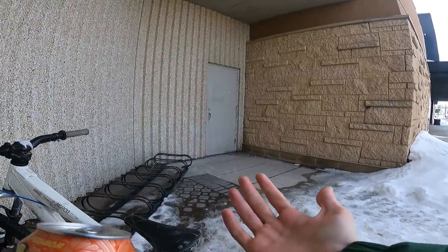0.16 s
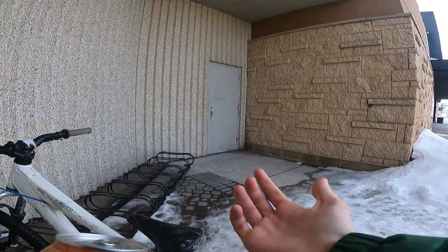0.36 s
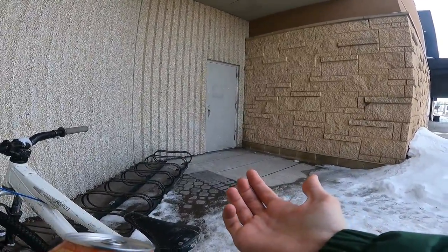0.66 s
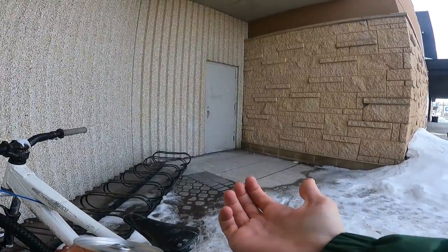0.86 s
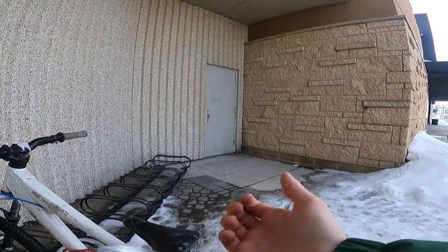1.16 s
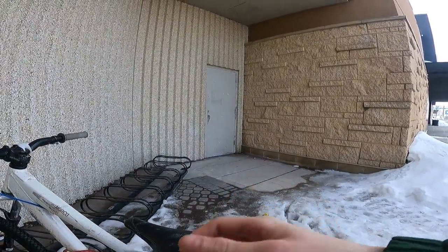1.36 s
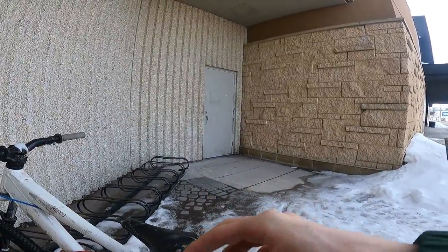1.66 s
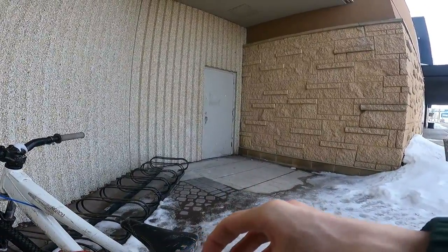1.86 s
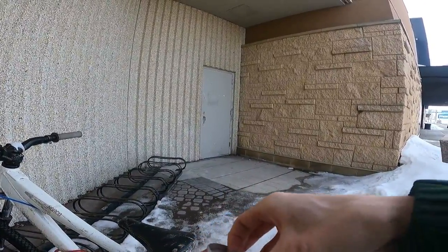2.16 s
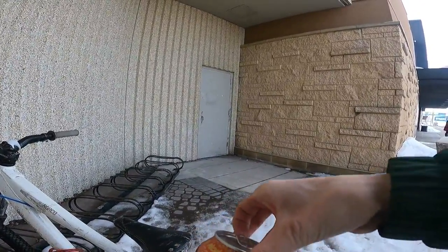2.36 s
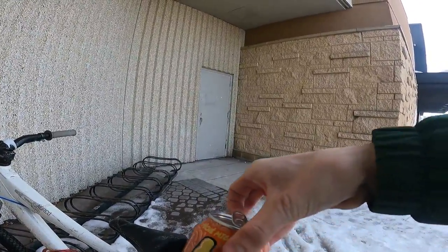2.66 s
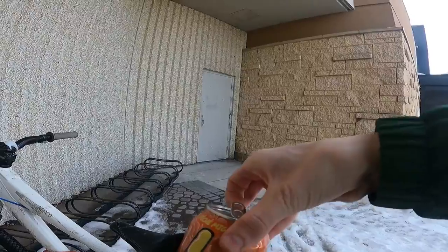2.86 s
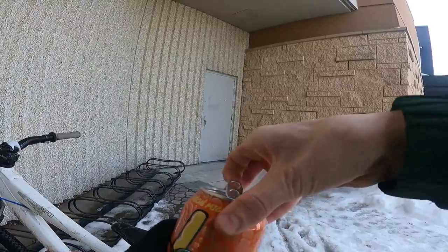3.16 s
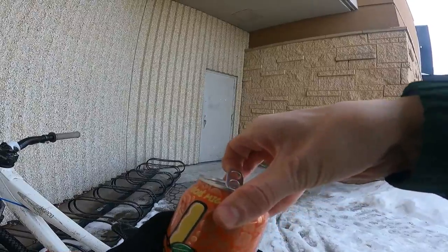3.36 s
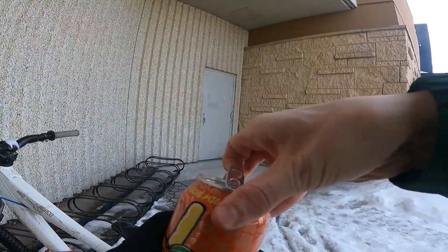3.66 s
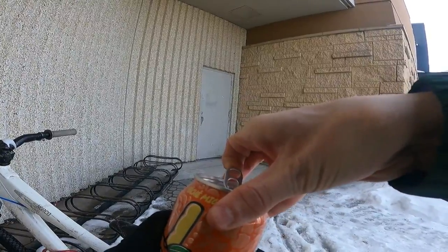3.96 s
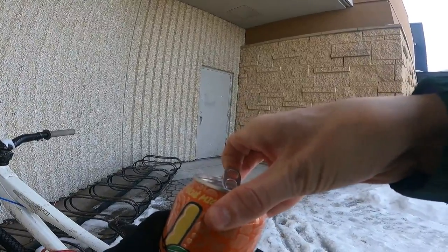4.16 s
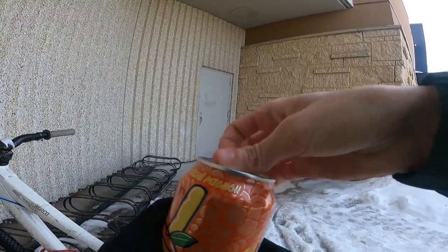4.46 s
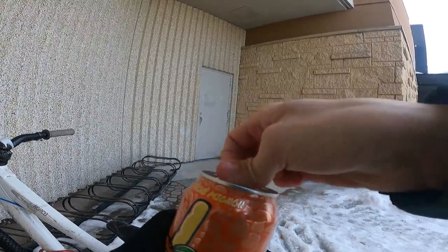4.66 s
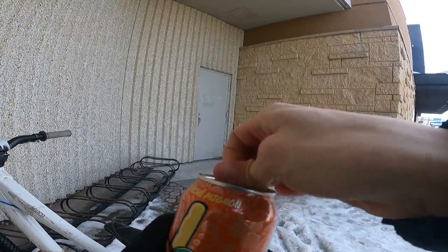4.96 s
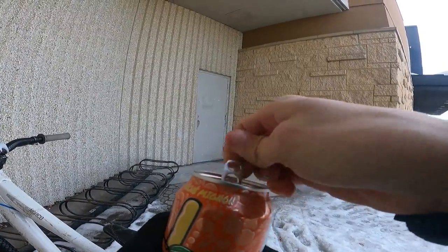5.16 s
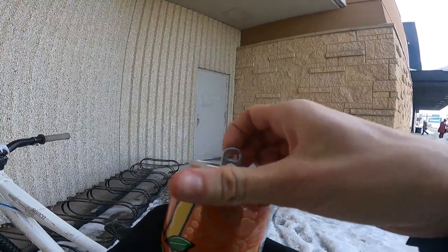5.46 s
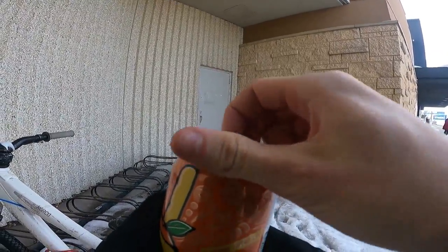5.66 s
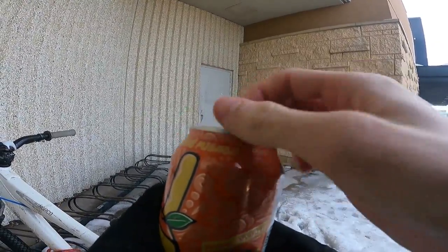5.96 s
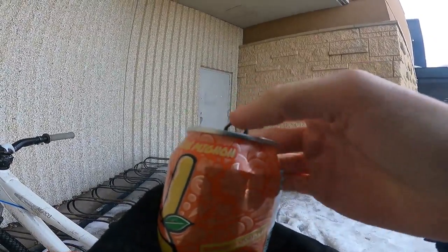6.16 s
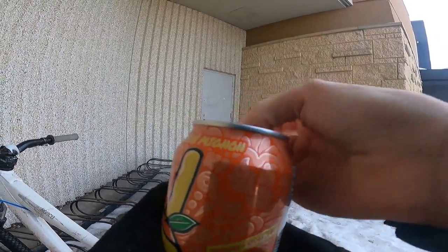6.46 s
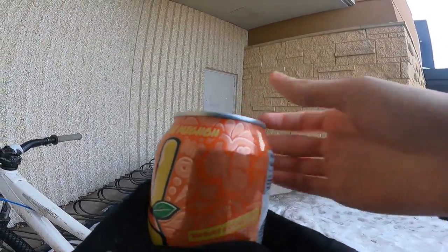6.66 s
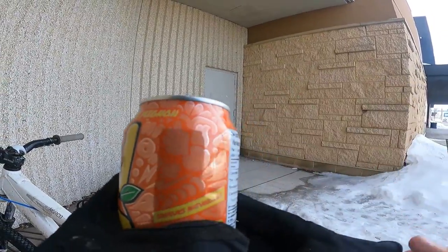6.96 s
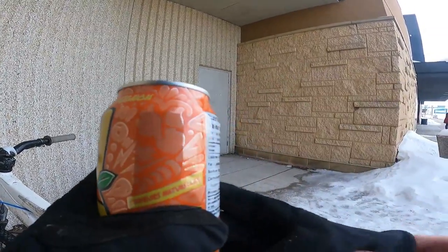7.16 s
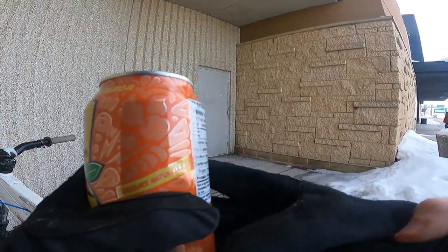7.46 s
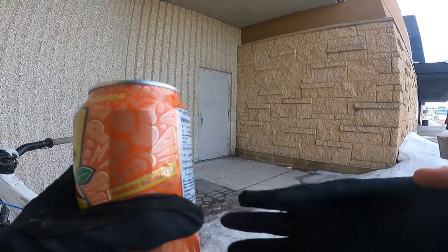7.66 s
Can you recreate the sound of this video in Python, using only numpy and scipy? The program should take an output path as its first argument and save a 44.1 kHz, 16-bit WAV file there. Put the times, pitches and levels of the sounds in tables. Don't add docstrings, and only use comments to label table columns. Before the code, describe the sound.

Outdoors over a low traffic and engine hum, nails tick on a can tab, the seal snaps and hisses, then the lid pops open with brief fizz.

```python
import sys
import numpy as np
from scipy import signal
from scipy.fft import rfft, irfft, next_fast_len
from scipy.io import wavfile

SR = 44100
rng = np.random.default_rng(int(sys.argv[2]) if len(sys.argv) > 2 else 0)


def how_loud(loudness_db):
    steps = np.asarray(loudness_db, float) / 20
    return 10 ** steps


def transcribe(signal):
    frames = np.atleast_2d(signal).T
    limited = np.clip(frames, -1, 1)
    pcm = np.round(limited * 32767).astype(np.int16)
    wavfile.write(sys.argv[1], SR, pcm)


N = 343980


def rms_one(x):
    return x / np.sqrt(np.mean(x ** 2) + 1e-20)


def in_time(rows):
    s, *columns = np.transpose(rows)
    return [np.interp(np.arange(N) / SR, s, c) for c in columns]


def at_hz(points, hz):
    table_hz, values = np.array(points).T
    return np.interp(np.log(hz), np.log(table_hz), values)


def drift(rate_hz):
    r = np.exp(-80 * np.pi * rate_hz / SR)
    noise = rng.standard_normal(N // 40 + 2002)
    slow = signal.lfilter([1], [1, -2 * r, r * r], noise)[2000:]
    return np.interp(np.arange(N) / 40, np.arange(len(slow)), rms_one(slow))


def band(x, low_hz, high_hz):
    return signal.sosfilt(signal.butter(2, [low_hz, high_hz], "band", fs=SR, output="sos"), x)


def coloured(x, spectrum):
    size = next_fast_len(N)
    hz = np.maximum(np.arange(size // 2 + 1) * SR / size, 1)
    return rms_one(irfft(rfft(x, size) * how_loud(at_hz(spectrum, hz)), size)[..., :N])


def resonate(x, peaks):
    out = 0
    for k, (hz, width, db) in enumerate(peaks):
        r = np.exp(-np.pi * max(width, 5) / SR)
        poles = [1, -2 * r * np.cos(2 * np.pi * hz / SR), r * r]
        out = out + (-1) ** k * how_loud(db) * signal.lfilter([1 - r, 0, r - 1], poles, x)
    return out


def resonate_twice(x, hz, width):
    peak = [(hz, 1.9 * width, 0)]
    return resonate(resonate(x, peak), peak)


def add(track, s, sound):
    i = round(s * SR)
    track[..., i:i + sound.shape[-1]] += sound[..., :N - i]


def swell(s, db, hold_s, rise_s, fall_s):
    t = np.arange(N) / SR - s
    steps = np.maximum(-t / max(rise_s, .001), (t - hold_s) / max(fall_s, .001))
    return db - np.clip(20 * steps, 0, 120)


def swing(delay_ms, width_ms, low_cut_hz):
    t = np.arange(3000) / SR * 1000
    dip = -np.exp(-((t - delay_ms) / width_ms) ** 2)
    return signal.lfilter(*signal.butter(1, low_cut_hz, "high", fs=SR), dip)


def blow(peaks, contact_ms, crack_db, damp_ms=11.0, rough=1.0, uneven_db=0.0):
    t = np.arange(4096) / SR * 1000
    push = t / contact_ms * np.exp(-t / contact_ms)
    contact = (1 + rough * rng.standard_normal(len(t))) * push + 1e-12
    click = 1.0 * (t == 0)
    ring = 0
    for (hz, width, db), luck in zip(peaks, rng.standard_normal(len(peaks))):
        share = np.std(resonate_twice(click, hz, width)) * how_loud(db + uneven_db * luck)
        ring = ring + rms_one(resonate_twice(contact, hz, width)) * share
    ring = ring * np.exp(-t / damp_ms)
    crack = band(contact, 900, 7000)
    sound = ring / np.abs(ring).max() + how_loud(crack_db) * crack / np.abs(crack).max()
    sound = signal.sosfilt(signal.butter(2, 13000, fs=SR, output="sos"), sound)
    return sound / np.abs(sound).max()


def struck(events, peaks, contact_ms, crack_db, damp_ms, uneven_db=0.0, rough=12.0):
    out = np.zeros(N)
    for s, db in events:
        add(out, s, how_loud(db) * blow(peaks, contact_ms, crack_db, damp_ms, rough, uneven_db))
    return out


def grains(per_s, spread_db):
    sizes = how_loud(spread_db * np.minimum(rng.exponential(1, N), 4)) * rng.choice([-1, 1], N)
    return sizes * (rng.random(N) < per_s / SR) + 1e-12


def spread(x, wide, pan_db):
    padded = np.pad(x, 4096, "reflect")
    side = wide * signal.hilbert(padded, next_fast_len(N + 8192)).imag[4096:N + 4096]
    return x * how_loud([[pan_db / 2], [-pan_db / 2]]) + side * [[1], [-1]]


def squeal_tone(s, hz, db, rise_s, fall_s, second_db, third_db):
    t = np.arange(N) / SR - s
    pitch = hz - 50 * np.maximum(t, 0)
    turn = 2 * np.pi * np.cumsum(pitch * (1 + .0012 * drift(40))) / SR
    tone = np.sin(turn) + how_loud(second_db) * np.sin(2 * turn) + how_loud(third_db) * np.sin(3 * turn)
    level_db = swell(s, db, .85 * fall_s, rise_s, fall_s) + 2.2 * drift(25)
    return np.sqrt(2) * how_loud(level_db) * tone


# t/s, level/dB
DUCKS = [
    (3.05, 1.5),
    (3.87, 1.5),
    (5.0, 7),
]


def ducking():
    out = 0
    for s, db in DUCKS:
        after = np.maximum(np.arange(N) / SR - s, 0)
        out = out - 2 * db * (1 - np.exp(-after / .15)) * np.exp(-after / .7)
    return out


# t/s, level/dB, width/s
GUST = (7.34, 3.5, .4)


def gust():
    s, db, width_s = GUST
    return db * np.exp(-((np.arange(N) / SR - s) / width_s) ** 2)


# t/s, level/dB
AIR_HISS = [(0, -70), (.56, -75.5), (1.21, -75.5), (1.45, -67), (1.61, -74), (2.06, -65), (2.45, -60),
            (3.41, -75.5), (3.82, -67), (4.15, -82), (4.45, -74), (4.97, -72), (5.42, -88), (5.72, -71),
            (5.93, -66.5), (6.03, -82), (6.5, -71.5), (7.8, -73)]
# f/Hz, level/dB per Hz
AIR_TONE = [(11, -30), (18, 4.5), (38, -2), (128, -13), (165, -11.5), (275, -22), (317, -20), (410, -21),
            (446, -27.5), (500, -23), (703, -41), (961, -34), (6820, -53), (9500, -63), (12200, -66),
            (16000, -93)]
# f/Hz, likeness (0 to 1)
LIKENESS = [(60, 1.0), (180, 1), (550, 1), (1650, 0.79), (4970, 0.84), (15000, 0.45)]
# f/Hz, share (0 to 1)
AIR_FOLLOWS = [(40, .1), (350, .12), (1700, .55), (8000, .95)]


def town_air():
    hiss_db = in_time(AIR_HISS)[0]
    hiss_db = hiss_db - np.median(hiss_db)
    edges = 16 * 2 ** np.arange(0, 10.1, .5)
    white = rng.standard_normal((2, 2, N))
    out = 0
    for k, (low, high) in enumerate(zip(edges, edges[1:])):
        mid, side = band(white[k % 2], low, high)
        hz = np.sqrt(low * high)
        share = at_hz(AIR_FOLLOWS, hz)
        alike = np.clip(at_hz(LIKENESS, hz) ** 2.7, 0, 1)
        level_db = at_hz(AIR_TONE, hz) + share * hiss_db + 1.3 * drift(17)
        level_db = level_db + (1 - share) * ducking() * (1 if hz < 120 else .6) + gust() * (hz < 120)
        stereo = np.sqrt(1 + alike) * mid + np.sqrt(1 - alike) * side * [[1], [-1]]
        out = out + how_loud(level_db) * stereo
    return how_loud(-36) * rms_one(out) * how_loud([[-.3], [.3]])


# t/s, level/dB
HUM = [(0, -48), (.32, -42), (.6, -39.5), (1.15, -51), (1.65, -35), (2.65, -41.5), (3.34, -47.5),
       (3.71, -43.5), (4.13, -55), (4.7, -47), (5.24, -56), (7.2, -55), (7.8, -47)]
# f/Hz, level/dB under the drone
FANS = [(240, -9.5), (323, -11), (355, -10.5), (405, -9.5)]
# t/s, f/Hz
FIRING = [(0, 80.67), (3.6, 79.63), (4.6, 77.18), (7.8, 76.64)]


def engine():
    second_db = in_time(HUM)[0] - 0.9 + 0.91 * drift(4.6)
    first_db = -46 + 3.5 * drift(1.2) + ducking() - 4.5 + 0.78 * drift(5.5)
    turn = 2 * np.pi * np.cumsum(in_time(FIRING)[0] * (1 + .003 * drift(4))) / SR
    out = how_loud(second_db) * np.sin(2 * turn) + how_loud(first_db) * np.sin(turn)
    for hz, db in FANS:
        fan_db = -48.5 + .6 * ducking() + db + 2.4 * drift(5.9)
        out += how_loud(fan_db) * np.sin(2 * np.pi * hz * np.arange(N) / SR + 1.67 * drift(2.8))
    boom = [(33, 18, 0)]
    throb = resonate(resonate(rng.standard_normal(N), boom), boom)
    return np.sqrt(2) * out + how_loud(-40 + ducking() + gust() - 6) * rms_one(throb)


# t/s, level/dB, brightness/dB, rise/s, fall/s
RUSTLE = [
    (.03, -48, -3, .1, .09),
    (1.4, -59, -5, .3, .2),
    (4.242, -49.5, 0, .028, .06),
    (6.415, -57, 1, .03, .03),
    (7.434, -49, -7, .015, .1),
    (7.6, -49, -1, .045, .03),
    (7.68, -64, -3, .3, .3),
]


def rustle():
    strokes = [how_loud(swell(s, db, .3 * fall_s, rise_s, fall_s)) for s, db, _, rise_s, fall_s in RUSTLE]
    dull = sum(strokes)
    bright = sum(x * how_loud(row[2]) for x, row in zip(strokes, RUSTLE))
    fibres = grains(9000, spread_db=3.0)
    body = resonate(fibres, [(980, 500, 1), (1700, 600, 4), (2500, 600, -2)])
    sheen = resonate(fibres, [(3700, 1400, 0), (7000, 2600, -14), (11300, 1900, -20)])
    rub = how_loud(16) * strokes[2] * rms_one(band(rng.standard_normal(N), 30, 180))
    rub += how_loud(-5) * strokes[2] * rms_one(resonate(fibres, [(4550, 70, 0)]))
    cloth = dull * rms_one(band(body, 500, 2800)) + bright * rms_one(band(sheen, 2700, 11000))
    return spread(cloth, .35, 0.074) + rub


# t/s, peak level/dB, ring f/Hz, left-right level/dB
TOUCHES = [(.063, -41, 5400, 2), (.173, -52, 6100, 3), (0.376, -46.5, 2700, 8), (0.39, -49, 6000, 1),
           (1.767, -37, 5100, 2), (1.772, -39, 1700, 2), (1.99, -45, 6500, 2), (1.993, -43, 2840, 4),
           (2.123, -49, 6000, 7), (2.228, -48, 5450, 9), (2.277, -35, 1900, 4), (4.44, -49.5, 7000, 0),
           (4.585, -46.5, 2500, 1), (5.035, -36, 4700, -2), (5.037, -35, 6950, 5), (5.41, -52, 2000, 0),
           (6.313, -55, 6500, 0), (7.43, -39, 1000, 2), (7.612, -38, 4200, 5)]


def touches():
    out = np.zeros((2, N))
    for s, db, hz, pan_db in TOUCHES:
        tap = blow([(hz, hz * 0.19, 0)], contact_ms=1.6, crack_db=-21.5, rough=5.0)
        add(out, s, how_loud(db) * tap * how_loud([[pan_db / 2], [-pan_db / 2]]))
    return out


# t/s, level/dB
GRABS = [(.445, -3), (.487, 3), (.55, -2), (.615, 4), (.658, 4), (.728, -1), (.82, 0), (.877, -1),
         (.94, -6), (.99, -9), (1.045, -9)]


def grabbing():
    t = np.arange(N) / SR
    return how_loud(-9) + sum(how_loud(db) * np.exp(-((t - s) / .02) ** 2) for s, db in GRABS)


# t/s, f/Hz, level/dB, rise/s, fall/s (per 20 dB)
SQUEAL = [
    (.45, 4785, -51.5, .06, .3),
    (.325, 4650, -55, .02, .17),
    (2.0, 5530, -65, .015, .2),
    (.77, 4700, -62, .05, .04),
    (.38, 4720, -62, .04, .06),
]


def brake_squeal():
    out = grabbing() * squeal_tone(*SQUEAL[0], -27, -49) + squeal_tone(*SQUEAL[1], -28, -40)
    return out + sum(squeal_tone(*row, -40, -50) for row in SQUEAL[2:])


# t/s, level/dB
BUMPS = [
    (.391, -24),
    (0.9955, -23.5),
    (3.6764, -10.5),
    (3.7621, -8),
    (7.735, -34),
]


def microphone_bumps():
    t = np.arange(3000) / SR * 1000
    edge = -np.cos(2 * np.pi * 0.33 * t) * np.exp(-t / 1.22) * (1 - np.exp(-(t / 0.15) ** 2))
    slow = swing(delay_ms=3.26, width_ms=1.57, low_cut_hz=18)
    knock = np.array([0.5 * edge + 0.23 * slow, 1.38 * edge + 1.8 * slow])
    out = np.zeros((2, N))
    for s, db in BUMPS:
        add(out, s, how_loud(db) * knock)
    return out


# t/s, peak level/dB
NAIL = [
    (2.3311, -39.5),
    (2.376, -25.5),
    (2.406, -26.5),
    (2.4169, -24),
    (2.4285, -26),
    (2.4492, -36),
]
# f/Hz, width/Hz, level/dB
NAIL_RING = [(2950, 200, -12), (4150, 600, 2), (7490, 310, -28)]


def nail_ticks():
    ticks = struck(NAIL, NAIL_RING, contact_ms=.06, crack_db=-24.5, damp_ms=3.0, rough=.4)
    return band(ticks, 2500, 5800)


# t/s, peak level/dB
SEAL = [
    (2.5518, -4),
]
# f/Hz, width/Hz, level/dB
SEAL_RING = [(2660, 200, -15), (3750, 450, -7), (4300, 600, 0), (5500, 130, -11), (6380, 300, -5),
             (7100, 200, -16), (8270, 300, -21), (9320, 200, -25), (10100, 250, -19), (12000, 500, -19)]


def seal_snap():
    return struck(SEAL, SEAL_RING, contact_ms=.07, crack_db=-22, damp_ms=2.5, rough=.2)


# t/s, level/dB, hold/s, rise/s, fall/s
VENT = (2.697, -24, .08, .018, .032)
VENT_SPURT = (2.705, -25, .004, .01, .015)
VENT_SIGH = (2.8, -62, .02, .05, .08)
# f/Hz, level/dB per Hz
VENT_TONE = [(290, -51.5), (500, -32.5), (545, -17.5), (1210, -12), (1930, -11), (2160, -15), (3540, -1.5),
             (5090, -4), (5880, 0.5), (8450, 0), (11100, -9), (12300, -7.5), (16000, -31)]


def gas_vent():
    flow = sum(how_loud(swell(*row)) for row in (VENT, VENT_SPURT, VENT_SIGH))
    return flow * coloured(grains(20000, spread_db=3.5), VENT_TONE)


# t/s, f/Hz, level/dB, rise/s, fall/s
SQUEAK = (3.037, 8020, -50, .011, .008)
# t/s, peak level/dB
RIVET = [
    (3.0443, -1),
]
# f/Hz, width/Hz, level/dB
RIVET_RING = [(1350, 200, -18), (1750, 330, -5), (3130, 120, -14), (3750, 420, 0), (4250, 520, -2),
              (5000, 250, -8), (6000, 250, -6), (6600, 150, -8), (7400, 180, -11), (8100, 170, -7),
              (8900, 200, -12), (10000, 300, -16)]


def rivet_crack():
    squeak = squeal_tone(*SQUEAK, -63.5, -60)
    return squeak + struck(RIVET, RIVET_RING, contact_ms=.1, crack_db=-20, damp_ms=4.0, rough=.2)


# t/s, peak level/dB
RATTLE = [
    (3.6706, -12),
    (3.7962, -15),
    (3.8005, -19),
    (3.8149, -10),
    (3.8676, -8),
    (3.8732, -13),
    (3.886, -24),
]
# f/Hz, width/Hz, level/dB
RATTLE_RING = [(600, 37, 0), (1920, 1100, -12.5), (3200, 250, -8), (4090, 340, -5), (5400, 400, -5.5),
               (5970, 150, 2.5), (7000, 300, -4), (8600, 600, -33), (9900, 460, -20), (12200, 320, -22)]


def tab_rattle():
    return struck(RATTLE, RATTLE_RING, contact_ms=.12, crack_db=-9, damp_ms=6.0, uneven_db=3.5, rough=2.5)


# t/s, peak level/dB
GRIP = [
    (4.2258, -30),
    (4.2417, -30),
    (4.244, -16.5),
    (4.262, -38),
    (4.2831, -41),
]
# f/Hz, width/Hz, level/dB
GRIP_RING = [(600, 150, -4), (2480, 430, 0), (4030, 280, -6), (4650, 220, -4), (5400, 300, -6),
             (7200, 420, -3), (8610, 290, -9), (9700, 240, -16), (11200, 290, -14), (12000, 300, -12)]


def grip_clicks():
    return struck(GRIP, GRIP_RING, contact_ms=.1, crack_db=-12, damp_ms=3.0, rough=.6, uneven_db=2.0)


# t/s, level/dB, hold/s, rise/s, fall/s
TEAR = (4.975, -25, .022, .016, .005)
TEAR_CREEP = (4.962, -52, .005, .03, .02)
# f/Hz, width/Hz, level/dB
TEAR_RING = [(703, 50, 6), (1180, 90, 0), (1810, 100, -10), (2480, 90, -12), (2770, 90, -11),
             (3200, 120, -2), (3605, 80, 6), (4450, 130, -5), (5025, 55, 8), (5700, 300, -16),
             (7150, 130, -8), (8390, 90, -10), (9200, 120, -14), (11000, 300, -22)]
# t/s, peak level/dB
POP = [
    (4.9838, -8),
    (4.9967, -1),
]
# f/Hz, width/Hz, level/dB
POP_RING = [(720, 160, 3), (1250, 200, -6), (2550, 200, -10), (3050, 150, -5), (3400, 220, 2),
            (4500, 250, -7), (5030, 130, -4), (5900, 300, -6), (7300, 350, -11), (8700, 400, -18)]


def lid_tear():
    slips = grains(9000, spread_db=2.5)
    rip = rms_one(resonate(slips, TEAR_RING)) + how_loud(-12) * rms_one(band(slips, 500, 5500))
    growth_db = 7 * np.clip((np.arange(N) / SR - TEAR[0]) / TEAR[2], 0, 1)
    out = (how_loud(swell(*TEAR) + growth_db) + how_loud(swell(*TEAR_CREEP))) * rip
    out += struck(POP, POP_RING, contact_ms=.08, crack_db=-10, damp_ms=9.0, rough=.5)
    add(out, POP[-1][0], how_loud(-10) * swing(delay_ms=3.4, width_ms=1.6, low_cut_hz=20))
    return out


# t/s, level/dB, hold/s, rise/s, fall/s
FIZZ = [
    (5.003, -30, .002, .003, .024),
    (5.02, -43, .03, .01, .22),
    (5.12, -66, .17, .1, .06),
]
# f/Hz, level/dB per Hz
FIZZ_TONE = [(710, -30), (1200, -16), (1390, -10.5), (1570, -18), (1830, -10), (2880, -8), (3420, -5),
             (4860, -9), (8820, -17), (14000, -46)]
# t/s, level/dB, hold/s, rise/s, fall/s
GURGLE = [
    (5.005, -37, .001, .003, .011),
    (5.17, -57, .14, .15, .015),
]


def fizz():
    froth, gurgle = (sum(how_loud(swell(*row)) for row in rows) for rows in (FIZZ, GURGLE))
    foam = grains(6100, spread_db=1.0)
    hiss = coloured(foam, FIZZ_TONE) + how_loud(-3) * rms_one(resonate(foam, [(3450, 320, 6), (8500, 200, -15)]))
    after = np.maximum(np.arange(N) / SR - GURGLE[0][0], 0)
    mouth_hz = 850 + 620 * after
    note = np.sin(2 * np.pi * np.cumsum(mouth_hz) / SR) * band(foam, 5, 60)
    mouth = rms_one(note) + how_loud(-5) * rms_one(resonate(foam, [(640, 90, 0)]))
    return how_loud(-6.5) * froth * hiss + gurgle * mouth


# t/s, peak level/dB, air note f/Hz, wall level/dB, crack level/dB
DENTS = [(5.601, -41.5, 930, -58, -52), (5.615, -39, 922, -60.5, -52), (5.636, -52, 945, -70, -58),
         (5.688, -47, 1130, -62, -52), (5.699, -38.5, 1106, -60, -42), (5.8685, -23.5, 969, -64.5, -38),
         (6.108, -23.5, 1016, -28.5, -46), (6.163, -46, 973, -60, -61), (6.261, -58, 1200, -57, -48),
         (6.5566, -32, 1090, -62, -33), (6.739, -42, 1105, -65, -50)]
# f/Hz, width/Hz, level/dB
WALL_RING = [(732, 30, 11.5), (1700, 70, -8), (2320, 60, 5.5), (2800, 80, 1.5), (3430, 120, -6),
             (3566, 60, 2.5)]
# t/s, peak level/dB, f/Hz, width/Hz
PINGS = [(5.603, -52, 3500, 300), (5.616, -52, 3500, 300), (5.7, -44, 3250, 350), (5.7, -48, 4450, 200),
         (5.701, -44, 7990, 250), (5.867, -42, 4000, 400), (5.868, -40, 5480, 300),
         (5.869, -44, 10500, 1200), (6.261, -50, 2500, 300), (6.262, -54, 4000, 400),
         (6.415, -50, 3200, 300), (6.425, -50, 1150, 120), (6.432, -48, 2750, 200), (6.434, -50, 1150, 120),
         (6.5566, -31, 3030, 200), (6.5566, -38, 1900, 700), (6.5572, -38, 4890, 450),
         (6.5566, -44, 6060, 250), (6.5566, -43, 8600, 900), (6.7, -56, 4500, 900), (6.739, -43, 775, 80),
         (6.739, -45, 2200, 90), (6.739, -51, 2750, 200), (6.74, -56, 6500, 900), (6.8, -55, 5800, 900)]


def dents():
    out = np.zeros(N)
    for s, db, hz, wall_db, crack_db in DENTS:
        t60_s = .033 + .0018 * max(wall_db + 52, 0)
        note = [(hz, 2.8 / max(t60_s, .01), 0)]
        snap = [(3180, 260, 0), (5000, 1500, -4), (1700, 900, -4)]
        add(out, s, how_loud(db) * blow(note, contact_ms=0.14, crack_db=-46, damp_ms=80, rough=0.103))
        add(out, s, how_loud(wall_db) * blow(WALL_RING, contact_ms=.07, crack_db=-30, damp_ms=50, rough=.1))
        add(out, s, how_loud(crack_db) * blow(snap, contact_ms=0.09, crack_db=0, rough=1.5))
    for s, db, hz, width in PINGS:
        add(out, s, how_loud(db) * blow([(hz, width, 0)], contact_ms=.06, crack_db=-30, damp_ms=20.0, rough=.2))
    return out


def alcove(x):
    t = np.arange(SR // 2) / SR
    noise = rng.standard_normal((2, len(t)))
    late = band(noise, 1200, 7500) * how_loud(-60 * t / 0.31) * (1 - np.exp(-(t / 0.019) ** 2))
    early = band(noise[::-1], 1300, 12000) * np.exp(-t / 0.0038) * (t > .002)
    tail = sum(how_loud(db) * part / np.sqrt(np.sum(part[0] ** 2)) for db, part in ((-31, late), (-16, early)))
    return signal.fftconvolve(x[None], tail + .7 * tail[::-1], axes=1)[:, :N]


def scene():
    around = town_air() + spread(engine(), .6, .1) + rustle() + touches()
    around = around + spread(brake_squeal(), .4, -2.0) + microphone_bumps()
    can = nail_ticks() + seal_snap() + gas_vent() + rivet_crack() + grip_clicks() + dents()
    tab = tab_rattle()
    lid = lid_tear() + fizz()
    echoes = alcove(can + tab + how_loud(-8) * lid)
    return spread(can + lid, .24, -.1) + spread(tab, .3, -2.5) + echoes + around


def band_limit(x):
    return signal.sosfilt(signal.butter(12, 16780, fs=SR, output="sos"), x)


# t/s, hold/s, rise/s, fall/s
FOLD = (4.3, 1.45, .4, 1.1)


def record(dry):
    mid, side = (dry[0] + dry[1]) / 2, (dry[0] - dry[1]) / 2
    start_s, hold_s, rise_s, fall_s = FOLD
    folded = np.maximum(1 + swell(start_s, 0, hold_s, rise_s, fall_s) / 20, 0)
    after_db = -4 * (np.arange(N) / SR > start_s + hold_s) * (1 - folded)
    low_db = -9.5 - 34 * folded + 2 * after_db
    middle_db = 3 - 25 * folded + after_db
    low = signal.sosfiltfilt(signal.butter(2, 370, "low", fs=SR, output="sos"), side)
    high = signal.sosfiltfilt(signal.butter(2, 10000, "high", fs=SR, output="sos"), side)
    side = how_loud(low_db) * low + how_loud(middle_db) * (side - low - high) + 1.8 * np.roll(high, 7)
    limited = 1.358 * np.tanh(np.array([mid + side, mid - side]) / 1.251)
    mix = signal.sosfilt(signal.cheby2(18, 50, 16700, fs=SR, output="sos"), limited)
    return band_limit(mix)


dry = scene()
out = record(dry)
transcribe(out)
```